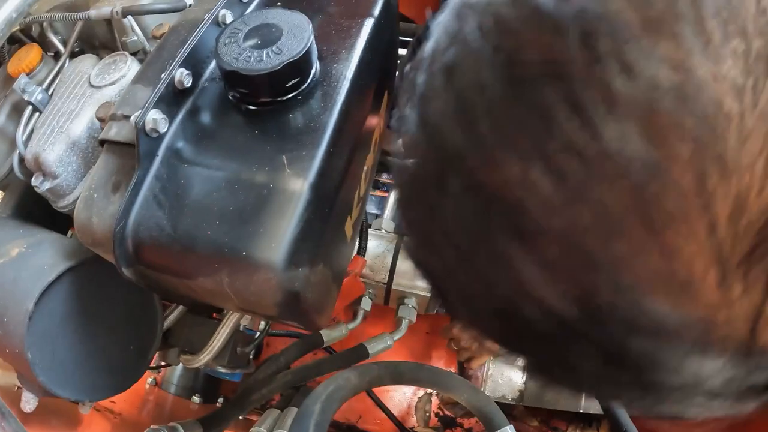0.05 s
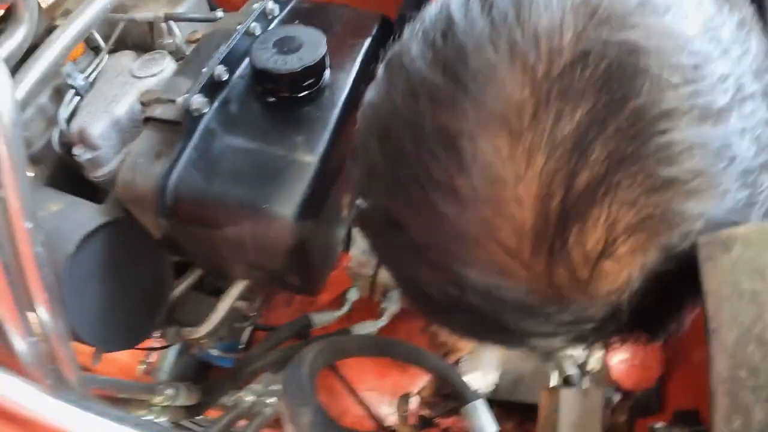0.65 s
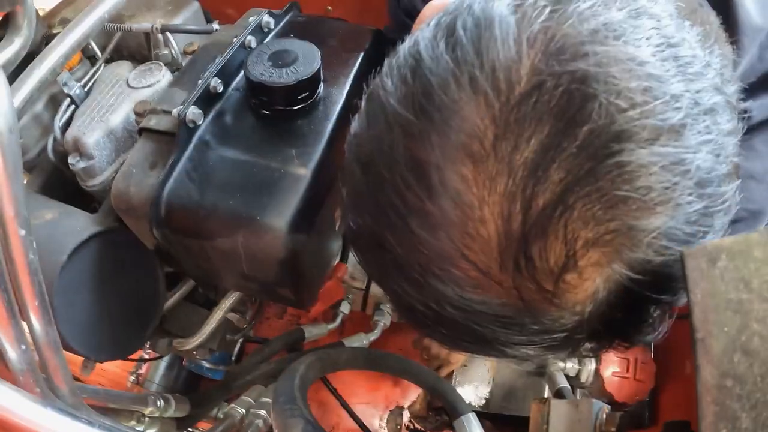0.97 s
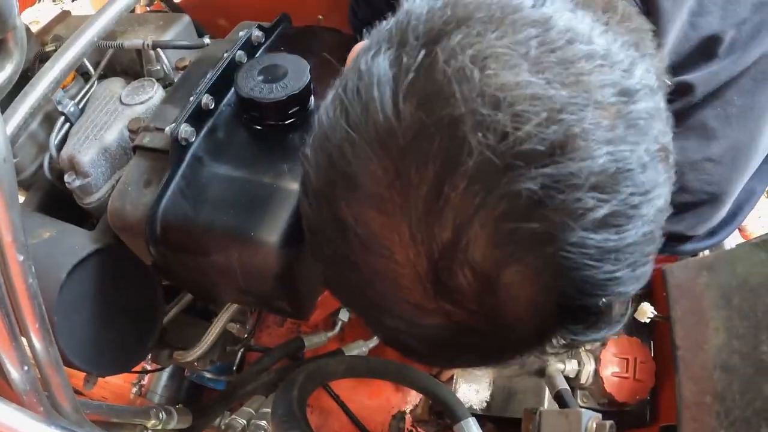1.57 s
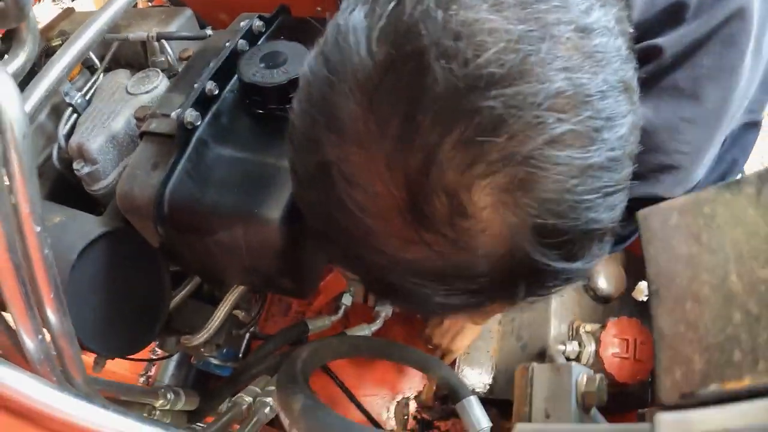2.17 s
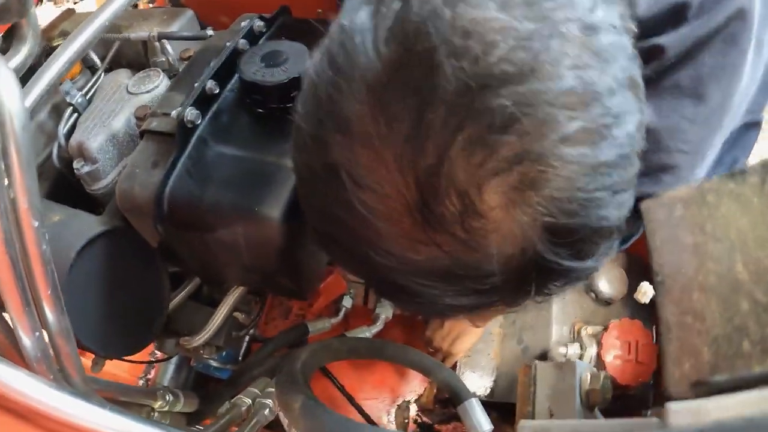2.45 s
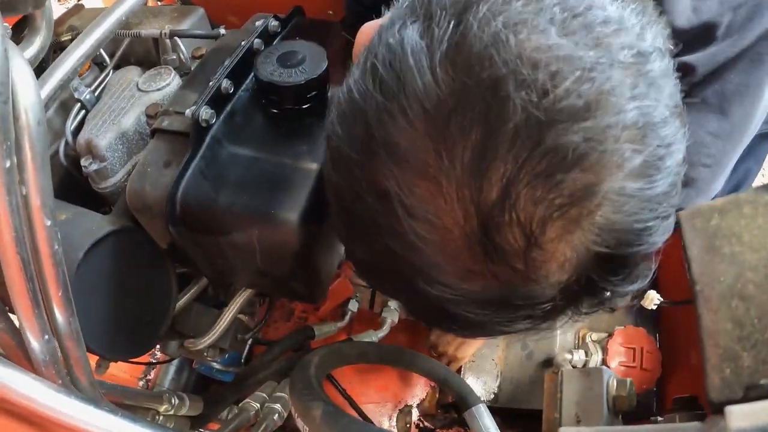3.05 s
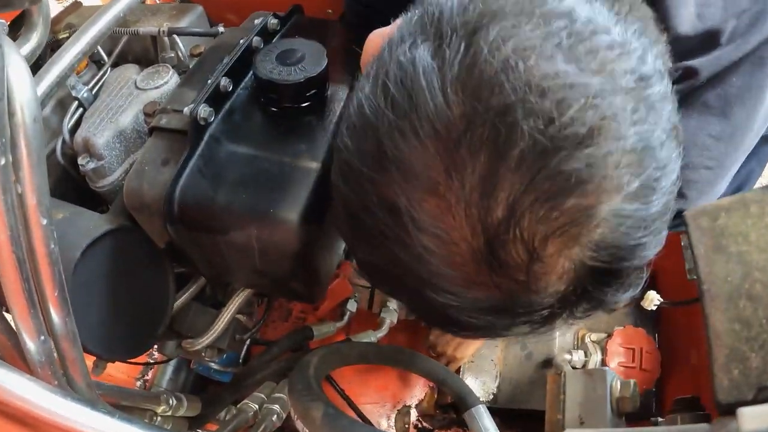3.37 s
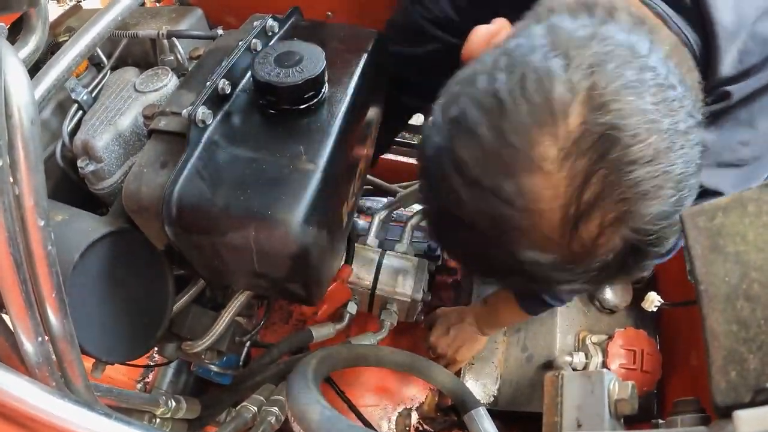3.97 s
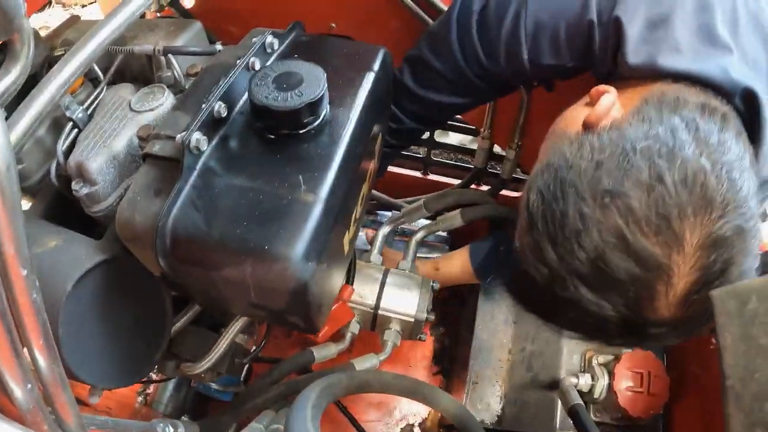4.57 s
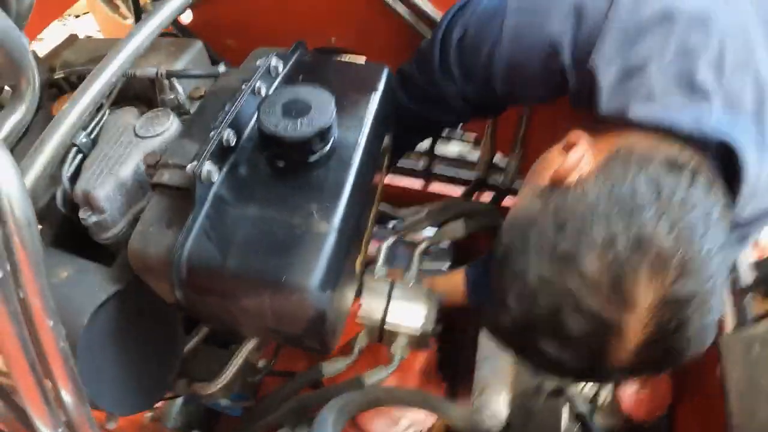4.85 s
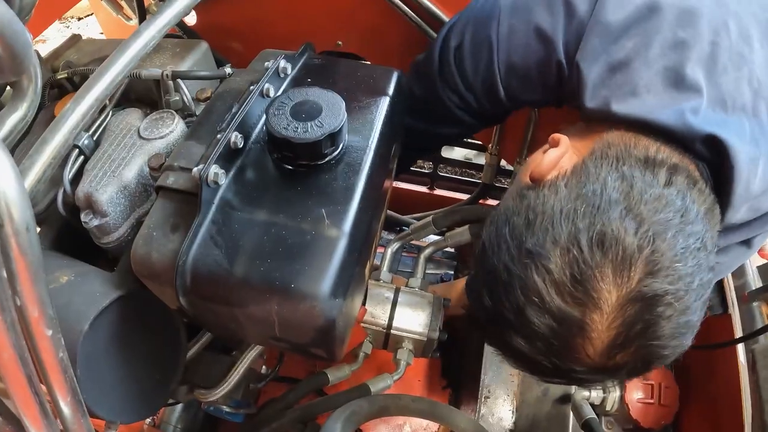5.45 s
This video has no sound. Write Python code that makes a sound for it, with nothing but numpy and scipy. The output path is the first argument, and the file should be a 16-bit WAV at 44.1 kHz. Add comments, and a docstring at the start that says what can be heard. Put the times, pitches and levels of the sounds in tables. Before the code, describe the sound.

Hands work hoses in an outdoor engine bay, making irregular scrapes, metal clicks and knocks, while gusts buffet the microphone and a distant bird whistles.

```python
"""Hands work among rubber hoses and a battery in an engine bay, outdoors, close under a hand-held phone.
First gusts buffet the microphones, the phone is bumped, hoses rub, fittings click, a bracket clanks.
The sound ducks after a loud knock at 0.7 s, then recovers; the image closes to near mono. From 2.3 s
a small bird whistles four times in the background. At 3.6 s the battery case is set down and rocks.
From 4.2 s a ribbed hose rasps, gusts and heavy bumps return, and at 5.2 s a steel part pings."""
import sys
import numpy as np
from scipy import signal
from scipy.fft import rfft, irfft
from scipy.io import wavfile
from scipy.ndimage import uniform_filter1d

SR = 44100
rng = np.random.default_rng(int(sys.argv[2]) if len(sys.argv) > 2 else 0)


def to_wav(s):
    """Save 16-bit WAV."""
    ch = np.atleast_2d(s).T  # columns
    pcm = np.round(np.clip(ch, -1, 1) * 32767)  # PCM
    wavfile.write(sys.argv[1], SR, pcm.astype(np.int16))


N = 247401
T = np.arange(N) / SR

# Steady rubbing level; ducks after the knock at 0.7 s, then recovers.
# Each row: time in seconds, relative level in dB.
RUBBING_LEVEL = [(0, 7), (.72, 1), (.78, -7), (1.08, -14), (1.28, -10.5), (1.46, 0.5), (1.78, -4.5),
                 (1.95, 0), (3.2, 2), (3.45, -0.5), (4.05, 0), (4.4, 6.5), (4.6, -4), (4.9, -1), (5.61, 3)]
# Hose pulls. Each row: start in seconds, length in seconds, judder in dB, scrape in dB.
HOSE_PULLS = [(0, 0.083, -28.5, -59), (0.25, 0.24, -25.5, -68), (0.461, 0.13, -27, -48),
              (0.58, 0.18, -35, -59), (1.375, 0.18, -52, -57), (1.649, 0.12, -39.5, -74),
              (1.848, 0.35, -38.5, -53), (2.26, 0.25, -35, -67), (2.594, 0.39, -40, -62),
              (3.666, 0.13, -31, -42), (3.746, 0.15, -39, -49.5), (4.14, 0.27, -37, -46),
              (4.274, 0.24, -32.5, -50.5), (4.692, 0.095, -43, -60), (5.231, 0.15, -37, -54),
              (5.368, 0.12, -36, -78), (5.534, 0.23, -42, -58)]
# Sleeve sweeps. Each row: start in seconds, length in seconds, hiss in dB.
SLEEVE_SWEEPS = [(0, 0.12, -71), (.24, 0.27, -71), (1.26, .1, -78), (3.67, 0.12, -64), (3.76, 0.4, -71),
                 (4.12, 0.21, -65), (4.35, 0.68, -70.5)]
# Spectra of rubber, hose skin and sleeve. Each row: frequency in Hz, relative level in dB.
JUDDER_SPECTRUM = [(35, -0.5), (70, 5.5), (130, 4), (200, -4), (300, -10), (450, -16.5), (700, -31),
                   (1500, -41.5)]
SCRAPE_SPECTRUM = [(200, -38), (450, 4), (850, 3), (1300, 4.5), (2000, -1), (3200, -3.5), (4500, -13.5),
                   (7000, -20), (10000, -54)]
HISS_SPECTRUM = [(1500, 10), (3500, 9.5), (5500, 10), (7300, 7.5), (8500, 1), (10500, -5), (12500, -5),
                 (14000, -10.5), (15200, -43)]
# Hose and sleeve slips, plus the low thud of the bump at 5.2 s.
# Each row: peak time in seconds, length in seconds, level in dB, centre in Hz, width in Hz.
NOISE_SWELLS = [(0.124, 0.17, -58, 3050, 494), (0.185, 0.024, -51, 7900, 7000),
                (0.37, .008, -54, 4500, 6000), (0.477, 0.033, -45.5, 2480, 3980),
                (0.54, 0.076, -44.5, 1270, 350), (0.595, 0.014, -50, 5560, 4960),
                (0.701, 0.0054, -36.5, 1100, 1000), (0.714, 0.0026, -36.5, 9400, 8000),
                (1.885, 0.026, -45.5, 650, 404), (1.965, .05, -48, 730, 300),
                (2.05, 0.15, -53.5, 2160, 1000), (2.130, 0.041, -44.5, 1160, 1740),
                (2.526, 0.018, -35.5, 1080, 348), (2.682, 0.022, -58, 3980, 5950),
                (3.069, 0.048, -47, 780, 400), (3.114, .07, -68.5, 10000, 7000),
                (3.496, 0.007, -38.5, 800, 403), (3.541, 0.083, -60, 6500, 2200),
                (3.546, 0.068, -53.5, 2770, 350), (3.564, 0.056, -43.5, 881, 248),
                (3.711, 0.042, -48, 3280, 2500), (3.744, 0.01, -54, 11500, 4000),
                (3.835, 0.074, -44.5, 900, 296), (4.201, 0.097, -44.5, 1035, 248),
                (4.223, 0.11, -50, 3430, 1200), (4.26, .006, -34, 395, 250),
                (0.836, 0.023, -49.5, 269, 120.6), (1.395, 0.024, -38.5, 156, 69.5),
                (1.808, 0.0062, -48.5, 700, 900), (3.96, .025, -68, 10500, 6000),
                (4.395, 0.028, -42, 1770, 900), (4.545, 0.05, -20, 135.4, 30), (4.71, .088, -55, 472, 79),
                (5.223, 0.0087, -26, 187, 130), (5.277, 0.032, -54.5, 6800, 6960),
                (5.29, 0.055, -56, 3000, 900), (5.436, 0.033, -47, 690, 129)]
# Ribbed hose. Each row: peak time in seconds, length in seconds, level in dB, catches per second.
HOSE_RASPS = [(0.014, 0.015, -43, 430), (4.184, .05, -45, 300), (4.235, 0.055, -47, 220),
              (4.314, 0.014, -37.5, 720), (5.17, 0.021, -45.5, 730), (5.304, 0.049, -55, 200)]
# Edge under that hose. Each row: centre in Hz, width in Hz, gain in dB.
EDGE_MODES = [(985, 220, 4.5), (1470, 200, -5), (2100, 350, -1), (2650, 350, -2.5), (3370, 300, -1),
              (5130, 560, -18.5)]
# Hollows between engine parts. Each row: centre in Hz, width in Hz, strength in thirds of a dB.
BAY_MODES = [(860, 160, -10.5), (1236, 52, -14), (2230, 81, -17), (3460, 92, -9), (3800, 170, -9.5)]
# Phone bumps. Each row: start in seconds, level in dB, nominal pitch in Hz, t60 in seconds.
PHONE_BUMPS = [(.013, -3, 60.6, 0.063), (.085, -24.5, 200, .03), (.191, -13.5, 45, 0.12),
               (.428, -6, 63, 0.13), (.704, -8.5, 64, 0.07), (.715, -6.5, 145.4, 0.023),
               (.717, -16.5, 381, 0.021), (1.817, -6, 71, 0.12), (1.835, -9.5, 72, 0.095),
               (1.885, -15.5, 64, 0.064), (2.055, -24, 74.5, 0.091), (2.814, -31, 124, 0.055),
               (2.161, -14.5, 55.4, .034), (2.521, -8.5, 90, 0.049), (3.040, -15, 106, 0.065),
               (4.323, -0.5, 53.1, 0.063), (4.324, -11, 140.5, 0.037), (4.325, -22, 514, .025),
               (4.417, -3.5, 47.4, .05), (4.468, -8.5, 58, 0.067), (4.737, -16.5, 64.7, 0.14),
               (4.990, -9.5, 45.3, 0.07), (5.217, -8, 73, 0.025)]
# Fitting contacts. Each row: start in seconds, reference level in dB, weight in dB, sharpness in dB,
# t60 in seconds, left minus right in dB.
FITTING_CLICKS = [(.254, -34.5, -3, 2, 0.064, -1), (.271, -38, 0.5, 4, 0.067, 6),
                  (.429, -40.5, 9, 11, 0.048, -8), (.492, -20, -4.5, 1, 0.076, 0),
                  (.660, -29.5, -5, -2, 0.014, -5.5), (.714, -22, 5, 0.5, 0.022, -4),
                  (.936, -51.5, 7.5, -4, 0.034, -12), (.974, -47, -10, 11.5, 0.081, 1.5),
                  (1.814, -39.5, 1.5, -3.5, 0.071, 4), (1.831, -36.5, 1, -1, 0.095, 6),
                  (1.941, -37, 0.5, 6, 0.066, 2), (2.377, -30.5, -14, -8, 0.092, -8),
                  (2.515, -28, -7.5, -9, 0.033, -1), (2.539, -32, -1.5, -9, 0.1, 1),
                  (3.033, -39, 2, -3.5, 0.19, -11), (4.321, -20.5, 0, 0.5, 0.037, -7),
                  (4.416, -26.5, -1, -2.5, 0.028, -9), (4.466, -26.5, -4, -12, 0.0093, -10),
                  (5.162, -41, -6, -1, 0.06, 7), (5.215, -32, 2.5, -15, 0.018, -16),
                  (5.584, -45, -10, 10, 0.05, -2)]
# Blows on battery case, steel part, bracket and hose clamp.
# Each row: start in seconds, level in dB, contact time in seconds.
CASE_BLOWS = [(3.638, -18.5, 0.00055), (3.643, -10.5, 0.00097), (3.657, -12.5, 0.0013),
              (3.722, -14, 0.0031), (.499, -14.5, 0.0028)]
STEEL_BLOWS = [(5.166, -38.5, 0.00019), (5.173, -46, 0.00013), (5.181, -40.5, 0.0002)]
BRACKET_BLOWS = [(.492, -21, 0.00019), (.502, -24, 0.00043), (2.378, -39.5, 0.00028), (4.324, -35, 0.00012)]
CLAMP_BLOWS = [(.271, -32, .00006), (.430, -30.5, .00006), (4.265, -39, .0001)]
# Modes of the same four. Each row: frequency in Hz, relative level in dB, t60 in seconds.
CASE_MODES = [(172, -6.5, 0.16), (197.2, 2.5, 0.14), (260, -4, 0.11), (338.5, -7, .1), (451, -5, 0.048),
              (618, -19, 0.16), (786, -10.5, 0.078), (856, -5.5, 0.081), (1006, -9, 0.096),
              (1056, -9, 0.066), (1480, -17, .04)]
STEEL_MODES = [(1115, -15.5, 0.11), (2335, -8.5, 0.2), (2470, -8.5, 0.11), (2700, -14, .06),
               (2970, -11, 0.07), (3250, -10.5, 0.14), (3540, -10, 0.06), (3870, -16, .05),
               (4380, -20, 0.04)]
BRACKET_MODES = [(664, -9, .06), (747, -7, 0.07), (1110, -10, .08), (1206, -1, 0.11), (1363, -2.5, 0.081),
                 (1710, -5, 0.077), (2040, -10, 0.078), (2423, -3, 0.069), (2630, -5, 0.07),
                 (3310, -1, 0.056), (3900, -3.5, .04)]
CLAMP_MODES = [(2620, -7, 0.071), (2960, -5, 0.043), (3370, 2, 0.027), (3710, -0.5, 0.029),
               (3940, -4, 0.024), (5300, -12, .03), (6170, -9.5, .03), (7120, -9, 0.036)]
# Breeze at the microphones. Each row: time in seconds, level in dB.
BREEZE_LEVEL = [(0, -9), (.7, -14), (.8, -29), (1.28, -30), (1.5, -32), (2.2, -31), (2.85, -33.5),
                (3.1, -32), (4.15, -29), (4.4, -15), (4.65, -24.5), (5.61, -21.5)]
# Puffs on top of it. Each row: start in seconds, length in seconds, level in dB.
WIND_PUFFS = [(.04, 0.15, -9.5), (.86, 0.15, -19.5), (1.8, 0.11, -12), (2.12, .11, -21), (2.49, .13, -17.5),
              (3.02, 0.13, -24), (3.3, 0.054, -26), (4.88, .22, -9), (5.18, 0.092, -12)]
# Spectra of eddies and distant work site. Each row: frequency in Hz, relative level in dB.
GUST_SPECTRUM = [(7, -13.5), (12, 7.5), (19, 1.5), (26, -3), (40, -5), (70, -19.5), (120, -42), (250, -45),
                 (500, -82)]
SITE_SPECTRUM = [(59, -32.5), (100, 0.5), (206, -11), (400, -26), (512, -23.5), (841, -30), (1660, -25),
                 (6790, -50), (14000, -60)]
# Bird calls. Each row: start in seconds, level in dB, pitch ratio, contour ceiling in Hz.
BIRD_CALLS = [(2.275, -45.5, 0.96, 6300), (3.25, -41.5, 0.97, 7050), (3.965, -39, 1.02, 7050),
              (4.983, -45, 0.95, 6820)]
# Contour of a call. Each row: age in seconds, nominal pitch in Hz, relative level in dB.
CALL_CONTOUR = [(0, 3900, -23), (.03, 4650, -13), (0.052, 5140, -8), (.075, 5370, -4), (.1, 5655, -2.5),
                (.12, 6260, -5), (.14, 6800, -8.5), (.175, 6400, -20)]
# Stereo width. Each row: time in seconds, side gain in dB.
STEREO_WIDTH = [(1, -0.5), (1.35, -11), (2.0, -38), (3.2, -51), (3.45, -21.5), (4.2, -8)]


def rubbing():
    """Stick-slip: rubber judders coarsely, hose skin scrapes finely, sleeves hiss."""
    level_db, pulls = curve(RUBBING_LEVEL), np.array(HOSE_PULLS)
    judder_gain = strokes(pulls[:, [0, 1, 2]], steady_db=-45.5 + 0.97 * level_db)
    scrape_gain = strokes(pulls[:, [0, 1, 3]], steady_db=-56 + level_db)
    hiss_gain = strokes(SLEEVE_SWEEPS, steady_db=-75 + 0.74 * level_db)
    releases = catches(2000, 1.75) * undb(2.4 * walk(30))
    grit = bay_hollows(catches(7000, 0.67) * undb(1.54 * walk(45)))
    fibres = catches(12000, 0.67) * undb(1.8 * walk(35))
    judder = colour(releases, JUDDER_SPECTRUM, 110, 450) * judder_gain
    scrape = colour(grit, SCRAPE_SPECTRUM, 600, 3500) * scrape_gain
    hiss = colour(fibres, HISS_SPECTRUM, 7800, 14000) * hiss_gain
    airborne = space(scrape + hiss, t60_s=0.018, wet_db=-2)
    # the exposed right microphone takes more judder
    return pan(space(judder, t60_s=0.042, wet_db=-3.5), -8) + airborne


def noise_swells():
    """Short noise swells: hose and sleeve slips, plus the low thud of a bump."""
    lead_s = 0.25
    out, t = np.zeros(N), T[:SR // 2] - lead_s
    grit = catches(6000, 1.5)
    for peak_s, length_s, db, hz, width_hz in NOISE_SWELLS:
        patch = rng.choice(grit, len(t))
        noise_band = unit(resonate(resonate(patch, hz, width_hz), hz, 2 * width_hz))
        add(out, peak_s - lead_s, noise_band * swell(t, length_s) * undb(db))
    return space(out, t60_s=0.05, wet_db=-5)


def rasps():
    """A ribbed hose catches and slips on an edge; each release rings it."""
    drive = np.zeros(N)
    for peak_s, length_s, db, rate_hz in HOSE_RASPS:
        releases = unit(catches(rate_hz, 0.6) + 0.5 * noise())
        drive += releases * swell(T - peak_s, length_s) * undb(db)
    edge_gain = np.linalg.norm(edge_ring(signal.unit_impulse(SR // 10)))
    return space(edge_ring(drive) / edge_gain, t60_s=0.04, wet_db=-3)


def edge_ring(x):
    """The edge resonates; soft rubber rounds off the top."""
    ring = sum(undb(db) * resonate(x, hz, width_hz) for hz, width_hz, db in EDGE_MODES)
    return band(ring, 660, 4500)


def phone_bumps():
    """Each bump swings the phone, slowing as the hand gives way."""
    out, t = np.zeros(N), T[:SR // 4]
    for start_s, db, nominal_hz, t60_s in PHONE_BUMPS:
        pitch_hz = nominal_hz * (0.815 + 0.59 * np.exp(-t / 0.011))
        shudder = unit(band(noise(len(t)), 110, 302, order=3))
        envelope = undb(-60 * t / t60_s) * (1 - np.exp(-t / 0.0028)) ** 2
        swing = (sine(pitch_hz) + undb(-23) * shudder) * envelope
        add(out, start_s, crest(swing, db))
    return pan(space(out, t60_s=0.044, wet_db=-14.5), -10.5)


def fitting_clicks():
    """Contacts chatter in the bay; weight adds body, sharpness adds edge and top."""
    out, t = np.zeros((2, N)), T[:SR // 4]
    bands_hz = (300, 800), (800, 2200), (2200, 5500), (5500, 14000)  # body, clack, edge, top
    for start_s, db, weight_db, sharp_db, t60_s, pan_db in FITTING_CLICKS:
        chatter = noise(len(t)) * undb(-60 * t / t60_s) * (1 - np.exp(-t / 0.0015))
        chatter = signal.lfilter(*signal.butter(1, 8000, fs=SR), bay_hollows(chatter))
        bands_db = weight_db - 3.5, -6.5, sharp_db - 14, sharp_db - 28.5
        click = sum(crest(band(chatter, *edges_hz, order=3), db + band_db)
                    for edges_hz, band_db in zip(bands_hz, bands_db))
        add(out, start_s, pan(click, pan_db))
    return space(out, t60_s=0.074, wet_db=-9)


def battery_knocks():
    """The hollow case rings as it is set down and rocks."""
    return space(struck(CASE_BLOWS, CASE_MODES), t60_s=0.11, wet_db=-16.5)


def metal_parts():
    """A tapped steel part bounces; clamps hit a bracket and tick on pipework."""
    pings = struck(STEEL_BLOWS, STEEL_MODES)
    clanks = struck(BRACKET_BLOWS, BRACKET_MODES)
    ticks = struck(CLAMP_BLOWS, CLAMP_MODES)
    return space(pings + clanks + ticks, t60_s=0.072, wet_db=-7)


def struck(blows, modes):
    """Blows ring an object's modes; longer contact loses the high ones."""
    out, t = np.zeros(N), T[:SR // 2]
    for start_s, db, contact_s in blows:
        ring = np.zeros(len(t))
        for hz, mode_db, t60_s in modes:
            detuned_hz = hz * (1 + 0.008 * rng.standard_normal())
            ring += undb(mode_db - 60 * t / t60_s) * np.sin(2 * np.pi * detuned_hz * t)
        push = signal.windows.hann(int(contact_s * SR) + 3)
        add(out, start_s, crest(signal.fftconvolve(ring, push), db))
    return out


def bay_hollows(x):
    """Gaps in the bay ring along with the sound inside them."""
    ring = sum(undb(strength / 3 - 6.5) * resonate(x, hz, width_hz)
               for hz, width_hz, strength in BAY_MODES)
    return 2.2 * x + ring


def wind():
    """Slow eddies press on the microphone ports, mostly the exposed right one."""
    eddies = colour(noise(), GUST_SPECTRUM, 10, 45)
    pressure = unit(np.tanh(0.68 * eddies))
    breeze_db = curve(BREEZE_LEVEL) + 2.48 * walk(12)
    return pan(pressure * strokes(WIND_PUFFS, breeze_db), -8)


def bird(warble_hz=130, flutter_depth=0.95):
    """A rising, fluttering whistle reflects off nearby walls, then echoes over the site."""
    out, t = np.zeros(N), T[:SR // 5]
    age_s, contour_hz, contour_db = np.transpose(CALL_CONTOUR)
    for start_s, db, ratio, ceiling_hz in BIRD_CALLS:
        flutter, warble = (unit(band(noise(len(t)), 40, 350, order=3)) for _ in range(2))
        pitch_hz = np.minimum(ratio * np.interp(t, age_s, contour_hz), ceiling_hz) + warble_hz * warble
        tone = np.sqrt(2) * unit(1 + flutter_depth * flutter) * sine(pitch_hz)
        add(out, start_s, tone * undb(db + np.interp(t, age_s, contour_db, right=-100)))
    near = space(out, t60_s=0.3, wet_db=-4.5)[0]
    return space(near, t60_s=0.86, wet_db=1)


def site(level_db=-61.5):
    """Faint, even wash of the distant work site."""
    wash = colour(noise(), SITE_SPECTRUM, 150, 8000)
    return space(wash * undb(level_db + walk(2.1)), t60_s=0.1, wet_db=-10.5)


def catches(rate_hz, spread_db):
    """Random stick-slip releases, a few much stronger than the rest."""
    releases = (rng.random(N) < rate_hz / SR) * noise()
    return unit(releases * undb(spread_db * np.minimum(rng.exponential(size=N), 4)))


def strokes(rows, steady_db, attack_share=0.21, release_share=0.33):
    """Gain of a steady level plus strokes that swell, hold and fade."""
    corners = np.array([0, attack_share, 1 - release_share, 1])
    power = sum((undb(db) * np.interp(T, start_s + length_s * corners, [0, 1, 1, 0])) ** 2
                for start_s, length_s, db in rows)
    return np.sqrt(undb(steady_db) ** 2 + power)


def swell(t, length_s):
    """Gaussian envelope about t = 0."""
    return np.exp(-0.5 * np.minimum((t / (length_s / 2)) ** 2, 60))


def space(x, t60_s, wet_db):
    """Direct sound plus dense reflections, different at each microphone."""
    t = T[:min(int(t60_s * SR) + 256, SR)]
    tails = noise((2, SR))[:, :len(t)] * undb(-60 * t / t60_s) * (t > 0.002)
    tails /= np.sqrt(np.sum(tails ** 2, axis=1, keepdims=True))
    wet = signal.oaconvolve(np.atleast_2d(x), tails, axes=1)[:, :N]
    return (x + undb(wet_db) * wet) / np.hypot(1, undb(wet_db))


def colour(x, points, lo_hz, hi_hz):
    """Shape the spectrum; rms 1 between the edges."""
    hz, db = np.transpose(points)
    bins_hz = np.arange(N // 2 + 1) * SR / N
    spectrum = rfft(x) * undb(np.interp(np.log(bins_hz + 1), np.log(hz), db, left=-120, right=-120))
    in_band = spectrum[(bins_hz > lo_hz) & (bins_hz < hi_hz)]
    return irfft(spectrum, N) * N / np.sqrt(2 * np.sum(abs(in_band) ** 2))


def band(x, lo_hz, hi_hz, order=2):
    """Band-pass."""
    return signal.sosfilt(signal.butter(order, [lo_hz, hi_hz], "band", fs=SR, output="sos"), x)


def resonate(x, hz, width_hz):
    """One resonance, gain 1 at centre."""
    return signal.lfilter(*signal.iirpeak(hz, hz / width_hz, fs=SR), x)


def sine(pitch_hz):
    """Sine along a pitch curve."""
    return np.sin(2 * np.pi * np.cumsum(pitch_hz) / SR)


def noise(shape=N):
    """White noise."""
    return rng.standard_normal(shape)


def walk(rate_hz):
    """Smooth random drift, rms 1."""
    hold = int(SR / rate_hz)
    steps = np.repeat(noise(N // hold + 1), hold)
    return unit(uniform_filter1d(steps, hold)[:N])


def curve(table):
    """Breakpoints to one value a sample."""
    return np.interp(T, *np.transpose(table))


def undb(db):
    """Decibels to gain."""
    return 10 ** (np.asarray(db) / 20)


def unit(x):
    """Scale to rms 1."""
    return x / np.sqrt(np.mean(x ** 2))


def crest(x, db):
    """Scale the loudest 6 ms to this level."""
    return x * undb(db) / np.sqrt(uniform_filter1d(x ** 2, size=256).max())


def pan(x, db):
    """Place by left minus right level."""
    gains = np.array([[undb(db / 2)], [undb(-db / 2)]])
    return x * gains / gains.mean()


def add(out, start_s, x):
    """Mix x in, cropped to the scene."""
    i = int(start_s * SR)
    out[..., max(i, 0):i + x.shape[-1]] += x[..., max(-i, 0):N - i]


def scene():
    """Stereo mix above the engine bay."""
    return (battery_knocks() + metal_parts() + wind() + rubbing() + phone_bumps()
            + fitting_clicks() + noise_swells() + rasps() + bird() + site())


def record(dry):
    """The ports add sheen; the phone narrows the image for a while, flattens peaks and cuts the top."""
    ported = dry + undb(-5.5) * resonate(dry, hz=12850, width_hz=520)
    mid = (ported[0] + ported[1]) / 2
    side = (ported[0] - ported[1]) / 2 * undb(curve(STEREO_WIDTH))
    stereo = np.array([mid + side, mid - side])
    clipped = stereo / (1 + stereo ** 16) ** (1 / 16)
    return signal.sosfilt(signal.ellip(10, 0.2, 90, 15500, fs=SR, output="sos"), clipped)


dry = scene()
out = record(dry)
to_wav(out)
```